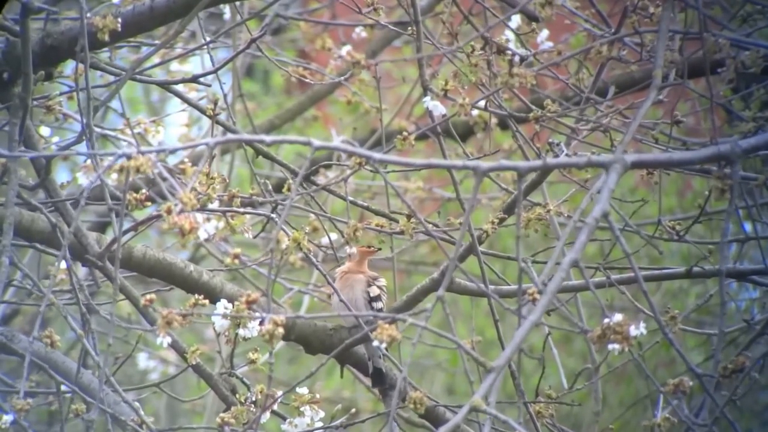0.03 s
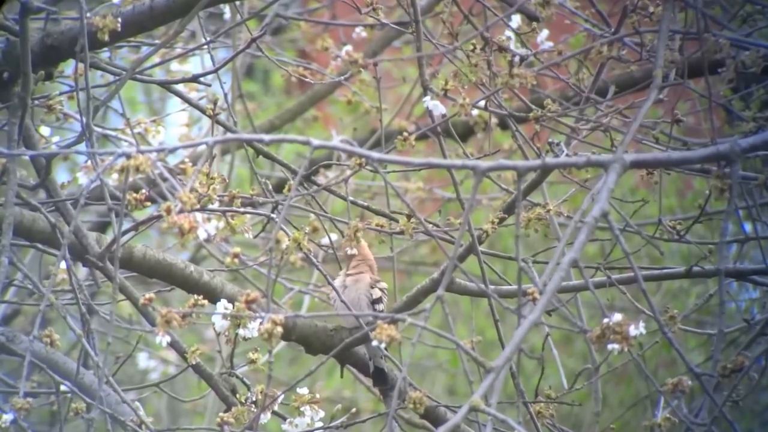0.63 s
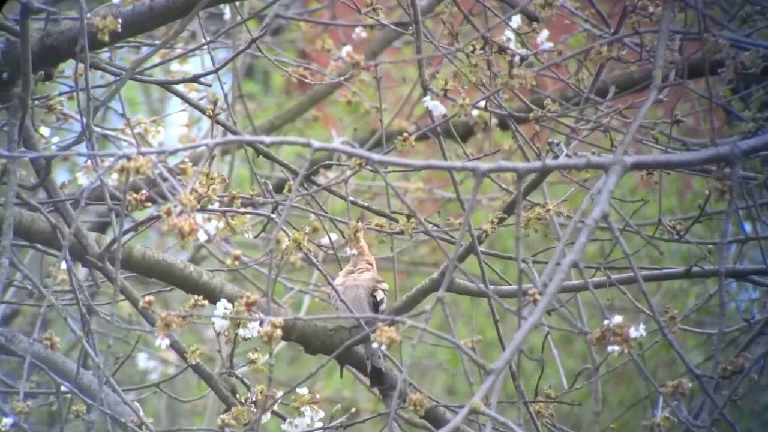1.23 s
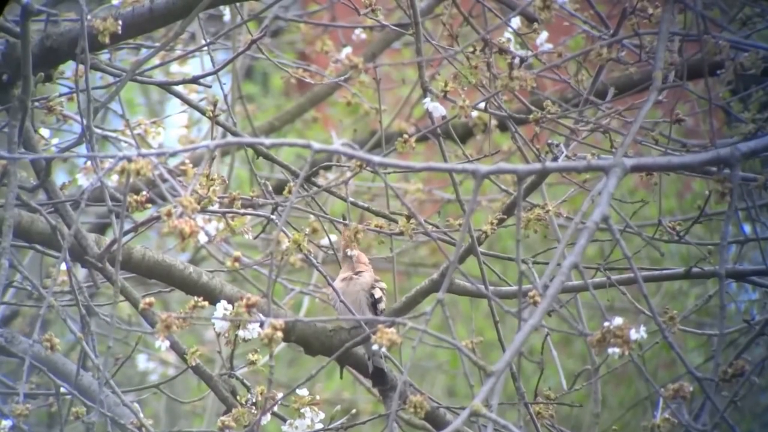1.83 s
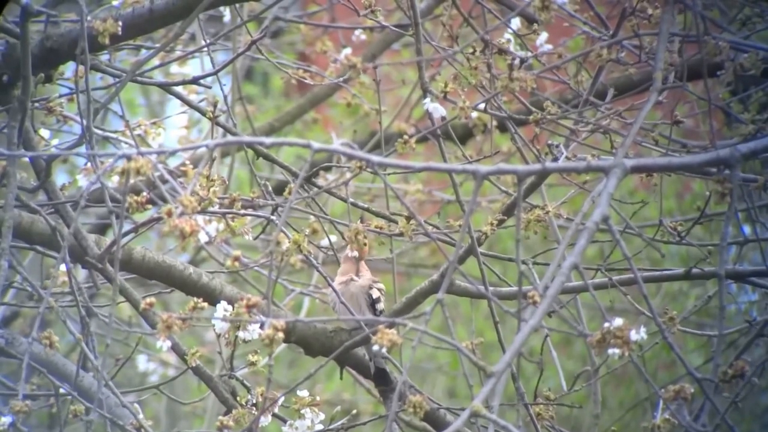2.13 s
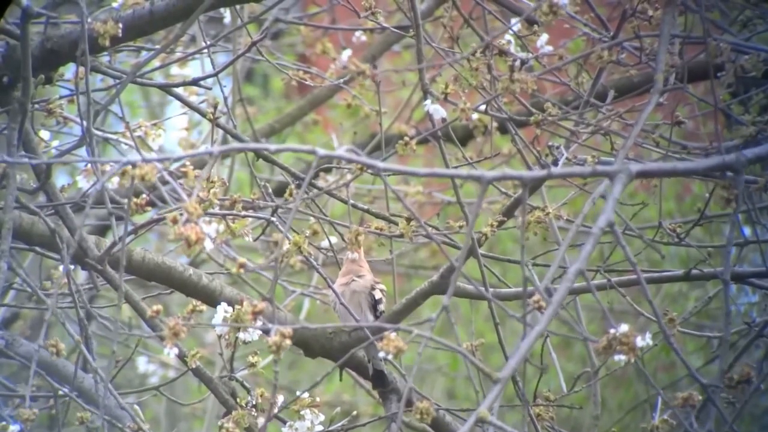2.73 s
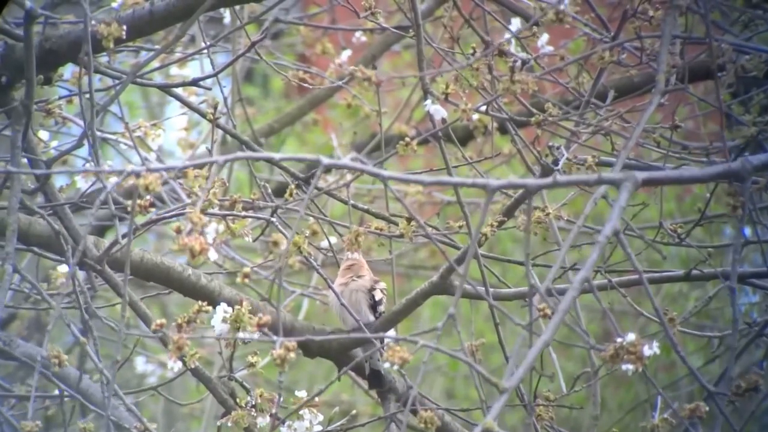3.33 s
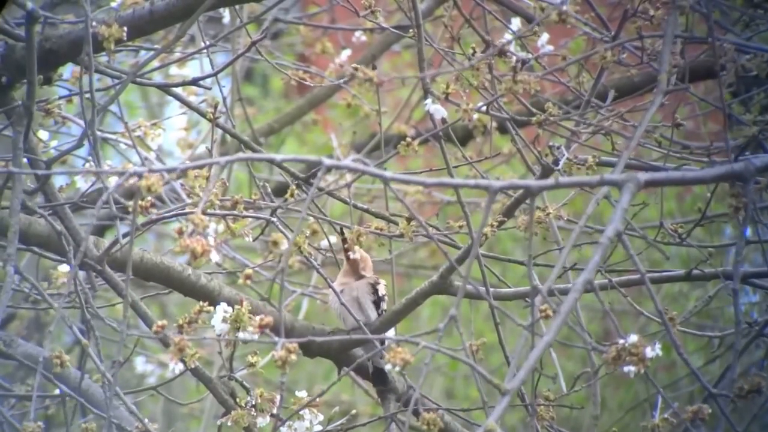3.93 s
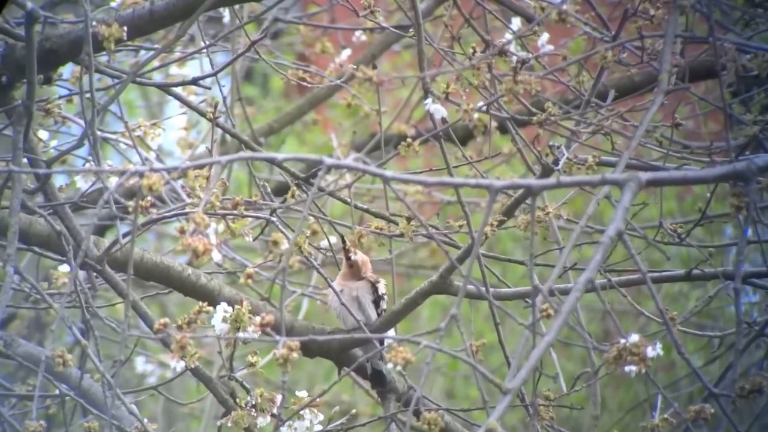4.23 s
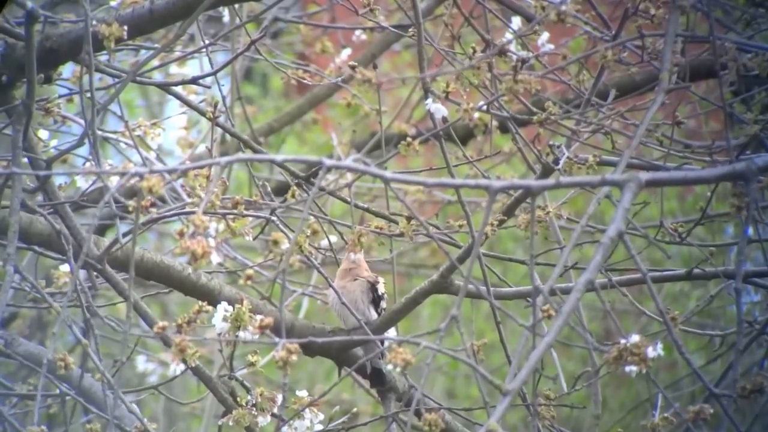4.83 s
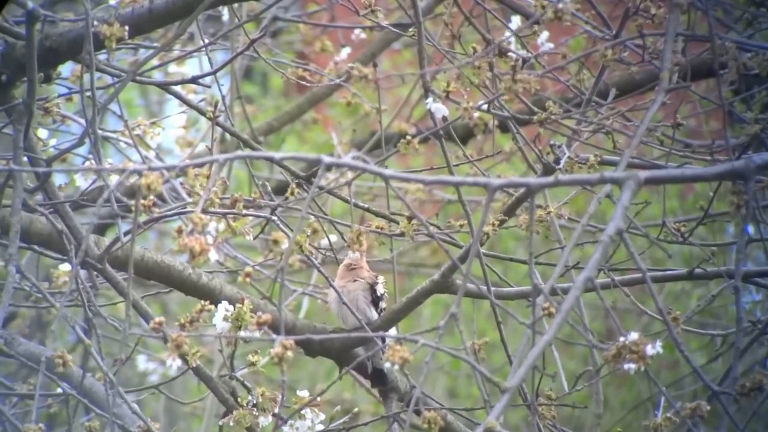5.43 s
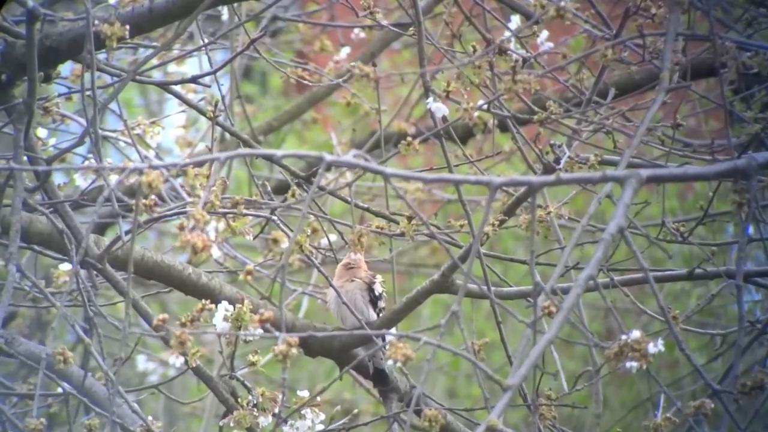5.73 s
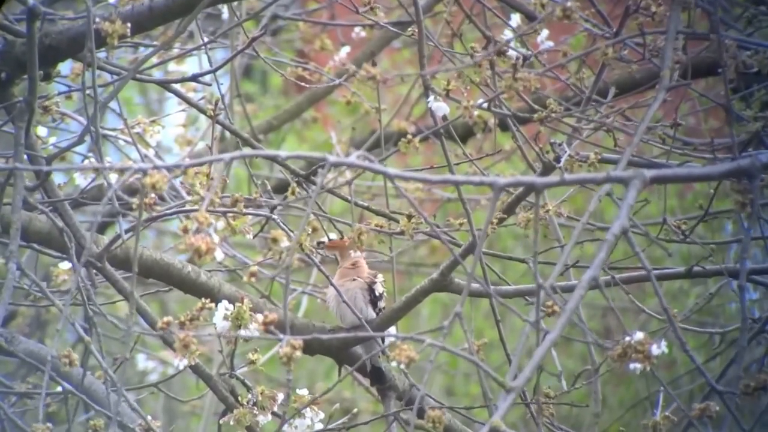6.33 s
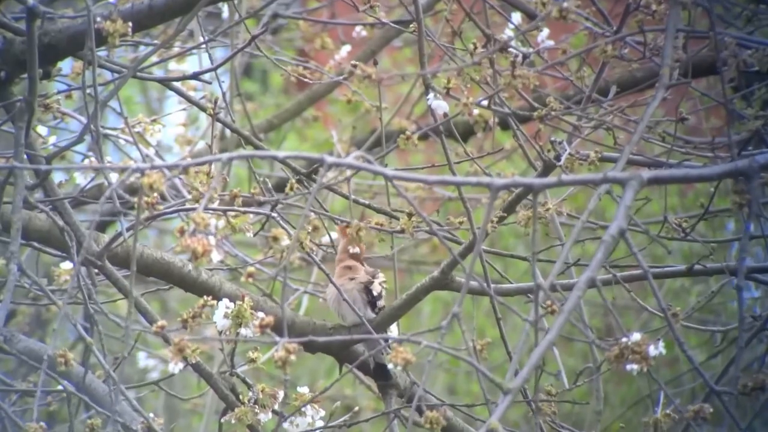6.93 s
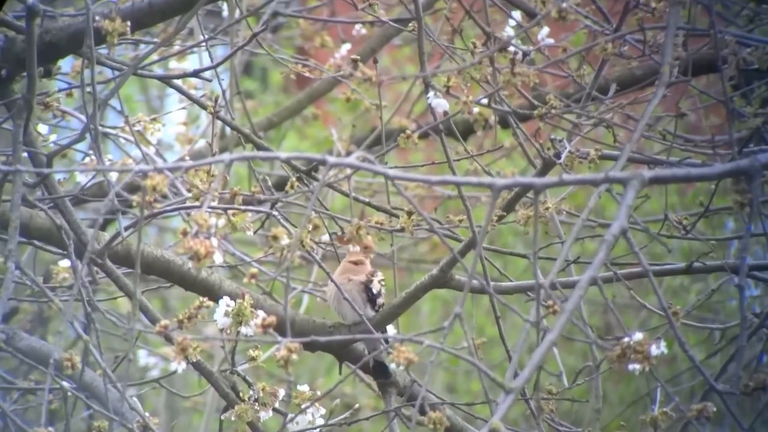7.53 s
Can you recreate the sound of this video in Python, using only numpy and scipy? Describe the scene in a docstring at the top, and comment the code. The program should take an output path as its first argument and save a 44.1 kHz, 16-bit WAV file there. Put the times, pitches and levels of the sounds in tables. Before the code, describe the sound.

A dull, low wash of distant traffic runs throughout in a garden, with far birds chirring faintly, slightly to the right. From about 0.4 seconds, gusts of wind hit the microphone in uneven low thumps, rumbles and slaps, close and much louder than the background, until about 2.7 seconds. A lull follows. Between 3 and 5.5 seconds a few short, faint, hoarse bird rasps sound, and two thin wavering whistles drift from afar, the higher around 3 to 4 seconds, the lower clearest just after 5. From 5 to about 6.5 seconds one distant bird gives a quick, high trill, strongest around 5.5. At about 6.4 seconds the wind returns harder, buffeting the microphone with slaps and tiny dry cracks, loudest near 6.6 and 7.1 seconds and briefly ducking everything else. Gusts continue to the end at about 7.7 seconds.

```python
"""A dull wash of distant traffic fills a garden, and gusts of wind soon thump the microphone.
The gusts are eddies, swirls of air that rumble, slap and crack, and push the recorder's limiter down.
Far birds chirr near 2.3 kHz and two thin whistles drift over from afar. At about five seconds one bird
breaks into a quick trill; then the wind comes back harder."""
import sys
import numpy as np
from scipy import signal
from scipy.fft import rfft, irfft
from scipy.io import wavfile
from scipy.ndimage import uniform_filter1d

SR = 44100
rng = np.random.default_rng(int(sys.argv[2]) if len(sys.argv) > 2 else 0)


def put_to_file(sound):
    """Save the sound as 16-bit audio at rate SR, in the file named by the first command-line argument."""
    columns = np.atleast_2d(sound).T  # one column per channel
    safe = np.clip(columns, -1, 1)
    whole_steps = np.round(safe * 32767)
    wavfile.write(sys.argv[1], SR, whole_steps.astype(np.int16))


N = 339570
TIME = np.arange(N) / SR
BINS_HZ = np.maximum(np.arange(N // 2 + 1) * SR / N, 1)

# tone colour of air tearing at the microphone: frequency_hz, relative_db
TEARING = [(250, -15), (500, 20.5), (850, 5), (1400, -3.5), (2200, -26), (3300, -33.5), (4200, -48),
           (8000, -64)]


def from_db(db):
    """Turn decibels into a number to multiply by."""
    return 10 ** (np.asarray(db) / 20)


def unit_power(x):
    """Scale a signal so that its average power is 1."""
    return x / np.sqrt(np.mean(x ** 2) + 1e-20)


def over_time(rows):
    """Join the rows of a time table into one curve for each column after the first."""
    time_s, *columns = np.transpose(rows)
    return [np.interp(TIME, time_s, column) for column in columns]


def over_frequency(rows):
    """Join the rows of a frequency table into a curve, giving each octave equal room."""
    hz, value = np.transpose(rows)
    return np.interp(np.log(BINS_HZ), np.log(hz), value)


def smooth(x, seconds):
    """Round off quick changes by taking a running average twice."""
    size = max(int(seconds * SR), 1)
    return uniform_filter1d(uniform_filter1d(x, size), size)


def drift(rate_hz):
    """A random wobble of typical size 1, mostly slower than rate_hz."""
    return unit_power(irfft(rfft(rng.standard_normal(N)) / (1 + (BINS_HZ / rate_hz) ** 2), N))


def noise(colour, alike):
    """Stereo noise with a given tone colour; alike=1 makes left and right the same."""
    mid, side = rfft(rng.standard_normal((2, N))) * from_db(over_frequency(colour))
    return unit_power(irfft(np.sqrt(1 + alike) * mid + np.sqrt(1 - alike) * side * [[1], [-1]], N))


def evened(x, seconds):
    """Take out slow swells so that only the fine grain remains."""
    return x / np.sqrt(smooth(np.mean(x ** 2, axis=0), seconds) + 1e-9)


def sine(hz):
    """A pure wave that follows a changing frequency."""
    return np.sin(2 * np.pi * np.cumsum(hz) / SR)


def panned(x, pan_db):
    """Move a sound to the left (above 0) or right (below 0)."""
    return x * from_db(np.array([[.5], [-.5]]) * pan_db)


def outdoors(x, echo_db, fade_s):
    """Trees and walls send back a short blurred echo, different on each side."""
    tail = rng.standard_normal((2, SR)) * from_db(-60 * TIME[:SR] / fade_s)
    tail /= np.sqrt(np.sum(tail ** 2, axis=1, keepdims=True))
    return x + from_db(echo_db) * signal.fftconvolve(x[None], tail, axes=1)[:, :N]


def traffic():
    """Far tyres and engines merge into a dull wash, a little to the right."""
    colour = [(15, -34), (35, 3.5), (60, 5.5), (130, 0), (330, 1), (540, -2.5), (690, -2), (850, -5.5),
              (1350, -7), (1550, -11), (2100, -15), (2700, -24), (3450, -34.5), (4100, -42.5),
              (6000, -68.5)]  # tone colour: frequency_hz, relative_db
    loudness = [(0, -43), (1, -43.5), (2.4, -43.5), (3.2, -41.5), (4.2, -42), (5.4, -41), (6.2, -43),
                (7.7, -40.5)]  # slow swells: time_s, level_db
    likeness = [(60, 1), (330, 1), (570, 0.96), (1000, 0.9), (1800, 0.9), (3100, 0.53)]  # how well left and right match: frequency_hz, alike (0 to 1)
    balance = [(350, 0), (540, -0.5), (1300, -2.5), (2000, -3), (3100, -6.5)]  # lean to one side: frequency_hz, left_minus_right_db
    level_db, = over_time(loudness)
    centred = noise(colour, over_frequency(likeness))
    wash = irfft(panned(rfft(centred), over_frequency(balance)), N)
    return from_db(level_db + 0.32 * drift(2.9)) * wash


def eddy_levels(rise_s, fall_s):
    """Strength in dB of large and small eddies: gusts build, hold and die away over a light breeze."""
    breeze = [(0, -37), (.3, -47), (2.2, -41.5), (2.65, -36.5), (2.8, -44), (3.2, -51.5), (4.15, -45),
              (4.8, -40), (5.05, -75), (6.2, -55.5), (6.4, -32), (7.7, -41.5)]  # large eddies in the light air: time_s, level_db
    gusts = [(0.437, .055, -25, -28.5), (0.549, .05, -28, -31), (0.618, 0.045, -28.5, -24),
             (.69, .15, -34.5, -42), (0.98, 0.056, -34.5, -40), (1.203, 0.087, -22, -24),
             (1.336, 0.13, -30.5, -38), (1.517, 0.091, -27, -23.5), (1.626, 0.067, -24.5, -20),
             (1.73, 0.047, -27, -23), (1.853, 0.028, -20, -19.5), (1.918, 0.031, -27, -29.5),
             (2.272, 0.015, -27, -30), (2.344, .06, -30, -31.5), (2.411, 0.046, -26.5, -23.5),
             (2.536, 0.079, -29, -29), (2.906, 0.038, -33, -44), (6.372, 0.064, -24, -29.5),
             (6.488, 0.066, -29.5, -26.5), (6.568, 0.037, -18.5, -13.5), (6.641, 0.061, -20, -17),
             (6.749, 0.041, -27.5, -26.5), (6.819, 0.028, -22, -20.5), (6.919, 0.11, -25, -28.5),
             (7.04, 0.14, -16.5, -10), (7.19, .04, -22.5, -21), (7.241, 0.051, -28, -29),
             (7.47, 0.048, -19.5, -19.5), (7.596, 0.23, -26.5, -30)]  # gusts on the microphone: start_s, length_s, large_db, small_db
    breeze_db = over_time(breeze)[0] + 4 * drift(11)
    power = from_db([breeze_db, breeze_db - 14]) ** 2  # small eddies are weaker in light air
    for start_s, length_s, large_db, small_db in gusts:
        near = np.abs(TIME - start_s) < .5
        age = TIME[near] - start_s
        rise = np.clip(age / rise_s + .5, 0, 1)
        fall = np.exp(-np.maximum(age - length_s, 0) / fall_s)
        power[:, near] += (from_db([[large_db], [small_db]]) * rise * fall) ** 2
    return 10 * np.log10(power)


def wind(large_db, small_db):
    """Large eddies cover both microphone openings; small ones hit each apart and veer between them."""
    large_colour = [(10, -12.5), (22, -17.5), (50, -4), (100, -2.5), (140, -2.5), (185, -11), (300, -58.5),
                    (600, -87.5)]  # deep rumble: frequency_hz, relative_db
    small_colour = [(70, -22.5), (125, -3.5), (165, 3), (230, -2), (320, -6), (420, -9), (560, -22.5),
                    (800, -34), (1500, -49), (4000, -96.5)]  # higher flutter: frequency_hz, relative_db
    large = from_db(large_db - 1.0) * evened(noise(large_colour, alike=0.92), seconds=0.07)
    swirl = evened(noise(small_colour, alike=0.61), seconds=0.028)
    flutter_db = 6.74 * np.tanh(drift(35))
    small = panned(from_db(small_db - 2.38 + flutter_db) * swirl, pan_db=4.1 * drift(15))
    # the flow tears at the pressure peaks of hard gusts
    peaks = unit_power(np.tanh(np.maximum(swirl - .3, 0) ** 2))
    tearing_db = -45 + 1.67 * (small_db + 22) + flutter_db
    tearing = from_db(tearing_db) * peaks * evened(noise(TEARING, alike=.1), seconds=0.0051)
    return large + small + tearing


def chirr(blur_hz):
    """Far bird voices throb; they arrive by many paths, which blurs their pitch and loudness."""
    loudness = [(0, -56), (.85, -57.5), (1.1, -61.5), (2.2, -55.5), (3.75, -58), (4.25, -73), (5.1, -53),
                (5.65, -50), (6.8, -55), (7.7, -49.5)]  # swells of the chirring: time_s, level_db
    pitch = [(0, 2376), (.85, 2440), (2.5, 2406), (3.2, 2203), (3.8, 2340), (5.7, 2263), (6.8, 2386),
             (7.7, 2277)]  # its centre: time_s, pitch_hz
    level_db, = over_time(loudness)
    throb = sine(22 + 3 * drift(4.1))
    gain = from_db(level_db - 0.9 + 1.6 * throb + 1.2 * drift(14))
    phase = 2 * np.pi * np.cumsum(over_time(pitch)[0]) / SR
    return gain * unit_power(drift(blur_hz) * np.cos(phase) + drift(blur_hz) * np.sin(phase))


def far_song():
    """Distance blurs the song of many birds into a flickering band of noise."""
    loudness = [(0, -65.5), (1.1, -72.5), (2.25, -68.5), (3.2, -70), (3.6, -65), (4.1, -72), (5.7, -70.5),
                (6.8, -66.5), (7.7, -67.5)]  # swells of the song: time_s, level_db
    colour = [(2200, -22), (2750, 3.5), (3000, -2), (3350, -4), (3750, -9), (4100, -23.5), (6000, -59.5)]  # tone colour: frequency_hz, relative_db
    return from_db(over_time(loudness)[0] + 2.9 * drift(15)) * noise(colour, alike=0.56)


def whistles():
    """Two thin, wavering tones echo from afar: a low one throughout, a high one midway."""
    low = [(0, 1360, -73.5), (2, 1381, -63), (4.9, 1384, -66), (5.05, 1390, -76), (5.12, 1370, -55),
           (5.45, 1398, -55.5), (5.65, 1382, -69), (6.3, 1400, -73), (7.7, 1370, -75)]  # lower tone: time_s, pitch_hz, level_db
    high = [(3.1, 2680, -82), (3.2, 2660, -62), (3.3, 2645, -62), (3.36, 2740, -63), (3.46, 2805, -64),
            (3.6, 2795, -72), (3.72, 2830, -62.5), (4, 2840, -72), (4.8, 2780, -79)]  # higher tone: time_s, pitch_hz, level_db
    both = np.zeros((2, N))
    for rows, waver_hz in (high, 12.5), (low, 2.17):
        pitch_hz, level_db = over_time(rows)
        sounding = (TIME >= rows[0][0]) & (TIME <= rows[-1][0])
        gain = sounding * from_db(level_db - 0.5 + 2.8 * drift(15))
        tone = unit_power(sine(pitch_hz + waver_hz * drift(30)))
        both += outdoors(gain * tone, echo_db=-2.5, fade_s=0.97)
    return panned(both, pan_db=-1.5)


def slaps(gust_db, swing_db, spurt_db, spurt_s, side_lag_s):
    """An eddy swings the pressure a few times, faster if it is tight, and tears off with a dry spurt."""
    hits = [(0.615, -16, -26), (1.25, -12, -23.5), (1.413, -11.5, -16.5), (1.642, -11, -21.5),
            (2.418, -12.5, -16), (2.465, -7.5, -26.5), (2.548, -6, -34), (2.602, -8, -33),
            (6.563, -9.5, -20.5), (6.591, -8.5, -20), (6.831, -9, -20.5), (6.927, -16, -12),
            (6.98, -16, -17), (7.036, -11.5, -14.5), (7.14, -5.5, -20), (7.169, -13.5, -13.5),
            (7.492, -6.5, -28)]  # single eddies on the microphone: time_s, peak_db, brightness_db
    swings, spurts = np.zeros((2, 2, N))
    t = TIME[:SR // 20] - .015
    for (time_s, peak_db, bright_db), (phase, lag) in zip(hits, rng.uniform(-1, 1, (len(hits), 2))):
        start = int((time_s + 0.0042 + t[0]) * SR)
        span = slice(start, start + len(t))
        age = t + np.array([[1], [-1]]) * lag * side_lag_s  # one side is hit first
        gain = from_db(peak_db + np.maximum(gust_db[start] + 18.5, 0))  # hard gusts slap harder
        pitch_hz = 270 * 2 ** ((bright_db + 23) / 19)
        swing = np.sin(2 * np.pi * pitch_hz * age + np.pi * phase)
        swings[:, span] += gain * np.exp(-(age / 0.0032) ** 2) * swing
        spurts[:, span] += gain * from_db(bright_db) * np.exp(-np.abs(age) / spurt_s)
    tearing = evened(noise(TEARING, alike=0.27), seconds=0.0023)
    return from_db(swing_db) * swings + from_db(spurt_db) * spurts * tearing


def far_calls():
    """Far birds sing thin gliding notes that swell and fade."""
    calls = [(.73, 0.098, 2390, 2550, -52), (.82, 0.039, 2455, 2430, -46), (1.21, .04, 9400, 9600, -73),
             (1.426, 0.097, 2440, 2410, -56.5), (5.378, 0.28, 3320, 3320, -73),
             (4.824, 0.026, 2380, 2300, -46), (5.68, 0.056, 3010, 3800, -68),
             (5.755, 0.071, 3200, 2480, -57.5), (5.758, 0.082, 4740, 3900, -73),
             (5.814, .06, 2750, 3200, -61), (5.852, .5, 4480, 4400, -80), (6.712, 0.031, 2390, 2280, -42)]  # single notes: start_s, length_s, start_hz, end_hz, peak_db
    notes = np.zeros(N)
    for start_s, length_s, start_hz, end_hz, peak_db in calls:
        start, size = int(start_s * SR), int(length_s * SR)
        glide = sine(np.linspace(start_hz, end_hz, size))
        notes[start:start + size] += from_db(peak_db) * np.hanning(size) * glide
    return notes * (1 + 0.21 * drift(50))


def rasps():
    """Hoarse bird calls: short swells of rough noise."""
    calls = [(3, .12, -56), (3.152, .1, -50), (3.245, 0.045, -47.5), (3.488, 0.055, -44),
             (4.538, 0.081, -55), (4.983, 0.047, -49), (5.441, 0.086, -46.5)]  # single rasps: start_s, length_s, level_db
    colour = [(1300, -38), (1850, -17), (2100, 4), (2350, 0), (2600, -1.5), (2900, -40), (3600, -22),
              (5000, -58)]  # tone colour: frequency_hz, relative_db
    swells = sum(from_db(level_db) * np.sin(np.pi * np.clip((TIME - start_s) / length_s, 0, 1))
                 for start_s, length_s, level_db in calls)
    return swells * from_db(4.3 * drift(70) - 2.0) * noise(colour, alike=0.99)


def trill(start_s, step_s, count, pitch_hz, rise_s, fall_hz_per_s):
    """One bird repeats a short falling note, each a little different and roughened on the way."""
    loudness = [(4.95, -48), (5.15, -41.5), (5.4, -49), (5.45, -35), (5.54, -34.5), (5.6, -45),
                (5.98, -37.5), (6.08, -42.5), (6.3, -42.5), (6.45, -54)]  # swells of the trill: time_s, peak_db
    level_db, = over_time(loudness)
    notes = np.zeros(N)
    t = TIME[:SR // 10]
    swell = (t / rise_s) ** 2 * np.exp(2 - 2 * t / rise_s)
    for k, (late, louder, higher) in enumerate(rng.standard_normal((count, 3))):
        start = int((start_s + k * step_s + .002 * late) * SR)
        glide = sine(pitch_hz + 28 * higher - fall_hz_per_s * (t - rise_s))
        notes[start:start + len(t)] += from_db(level_db[start] + louder) * swell * glide
    return notes * (1 + 0.24 * drift(120)) * (1 + 0.26 * drift(200))


def chip():
    """One faint, high bird call: a brief swell of bright noise."""
    loudness = [(5.66, -100), (5.76, -77), (5.79, -72), (5.86, -73), (5.95, -78), (6.3, -100)]  # its rise and fall: time_s, level_db
    colour = [(2000, -30.5), (2900, 1), (3600, -11.5), (4000, -3), (4450, -1.5), (5000, -12), (6200, -17.5),
              (8000, -38.5)]  # tone colour: frequency_hz, relative_db
    return from_db(over_time(loudness)[0] + 7.0 + 2.5 * drift(40)) * noise(colour, alike=0.77)


def birds():
    """All the bird voices together, mostly a little to the right."""
    voices = chirr(blur_hz=154)
    voices += trill(start_s=4.952, step_s=.0452, count=34,
                    pitch_hz=2292, rise_s=0.0053, fall_hz_per_s=4000)
    high_chip = chip()
    nearer = outdoors(voices, echo_db=-10.5, fade_s=0.63)
    farther = outdoors(far_calls(), echo_db=-5.5, fade_s=.7)
    background = panned(far_song() + rasps(), pan_db=-3.5)
    return panned(nearer + farther, pan_db=-2) + high_chip + background


def cracks(gust_db, fade_s):
    """The hardest gusts tear at the microphone's grille in tiny dry bursts, louder in stronger wind."""
    hits = [(6.58, -45), (6.592, -25), (6.9338, -33), (7.0625, -37.5), (7.1035, -38.5), (7.1433, -28.5),
            (7.1554, -35.5), (7.1708, -32.5)]  # single cracks: time_s, peak_db
    colour = [(500, -9), (1000, 6.5), (2000, 1), (2600, -9.5), (3400, -20), (4300, -33.5), (8000, -54)]  # tone colour: frequency_hz, relative_db
    bursts = sum(from_db(peak_db) * np.exp(-np.abs(TIME - time_s - .002) / fade_s)
                 for time_s, peak_db in hits)
    gain = from_db(np.maximum(gust_db + 21.5, 0) - 1)
    return gain * bursts * evened(noise(colour, alike=0.51), seconds=0.0034)


def scene():
    """Wind close by, everything else far off."""
    large_db, small_db = eddy_levels(rise_s=.022, fall_s=0.021)
    far_whistles = whistles()
    buffets = wind(large_db, small_db)
    buffets += slaps(small_db, swing_db=-2.5, spurt_db=6.0, spurt_s=0.0033, side_lag_s=0.00056)
    buffets += cracks(small_db, fade_s=0.0013)
    return traffic() + buffets + birds() + far_whistles


def sinking_peaks(db, db_per_s):
    """Catch each peak and let it sink at a steady rate."""
    return np.maximum.accumulate(db + db_per_s * TIME) - db_per_s * TIME


def limiter(x, threshold_db, charge_s):
    """Turn loud moments down: brief ones are let go quickly, long ones keep the volume low a while."""
    power = smooth(np.mean(x ** 2, axis=0), seconds=0.013)
    level_db = 10 * np.log10(np.maximum(power, 1e-12))
    quick_db = sinking_peaks(np.maximum(level_db - threshold_db, 0), db_per_s=157.0)
    keep = np.exp(-1 / (charge_s * SR))
    built_up_db = signal.lfilter([1 - keep], [1, -keep], quick_db)
    slow_db = sinking_peaks(built_up_db, db_per_s=12)
    return x * from_db(-smooth(np.maximum(quick_db, slow_db), seconds=0.0063))


def record(dry):
    """The recorder adds hiss and a faint whine, limits the gusts and cuts the highest treble."""
    hiss_colour = [(1000, -2.5), (4000, -3.5), (5000, 1), (6700, 0), (8000, -2), (11000, -2.5),
                   (15000, -6.5)]  # the recorder's own hiss: frequency_hz, relative_db
    whine_hz, cutoff_hz = 15625, 15720
    hiss = from_db(-69) * noise(hiss_colour, alike=0.93)
    whine = from_db(-79.5) * unit_power(np.sin(2 * np.pi * whine_hz * TIME))
    limited = limiter(dry + hiss + whine, threshold_db=-18.5, charge_s=0.055)
    treble_cut = signal.ellip(12, .1, 80, cutoff_hz, fs=SR, output="sos")
    return signal.sosfilt(treble_cut, limited)


dry = scene()
out = record(dry)
put_to_file(out)
```